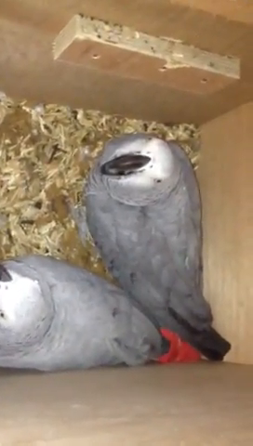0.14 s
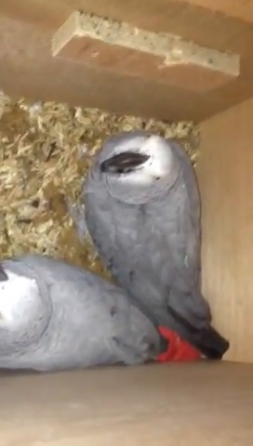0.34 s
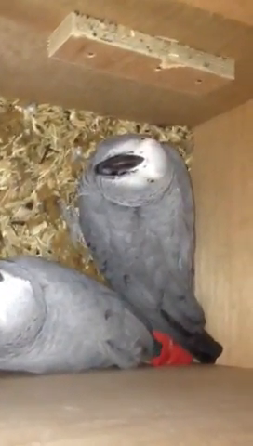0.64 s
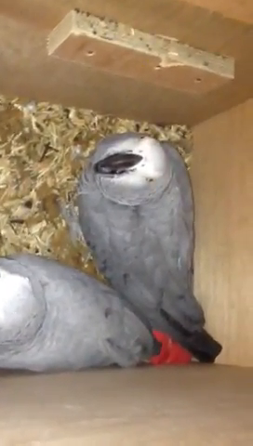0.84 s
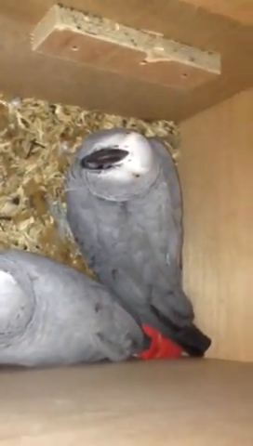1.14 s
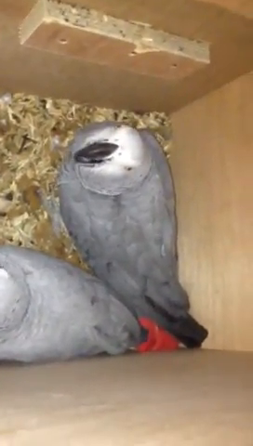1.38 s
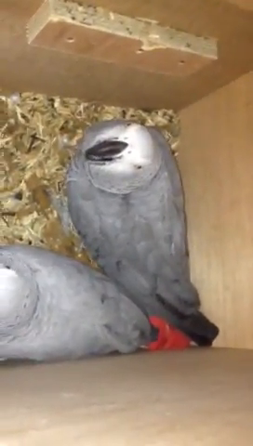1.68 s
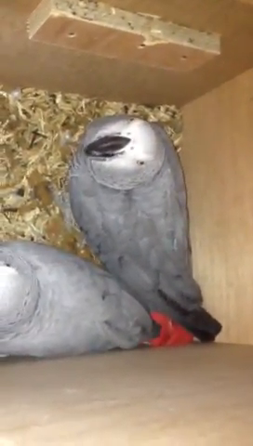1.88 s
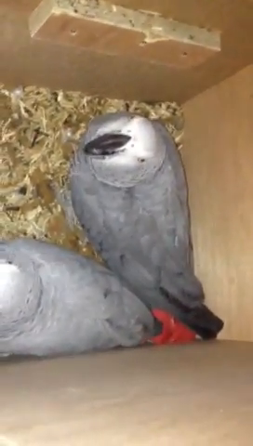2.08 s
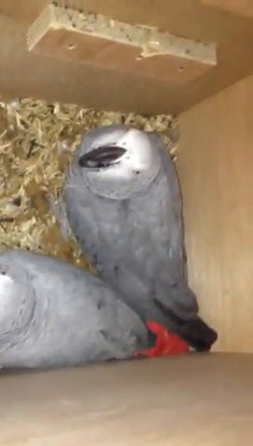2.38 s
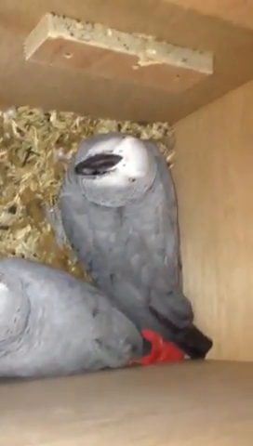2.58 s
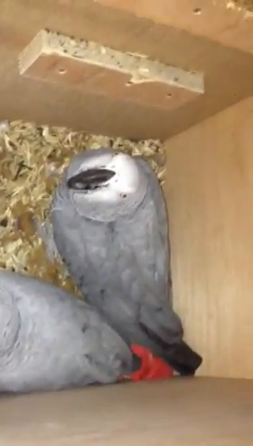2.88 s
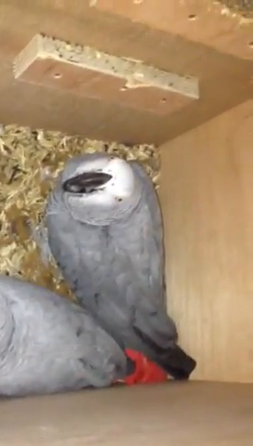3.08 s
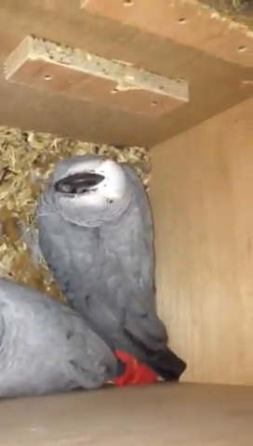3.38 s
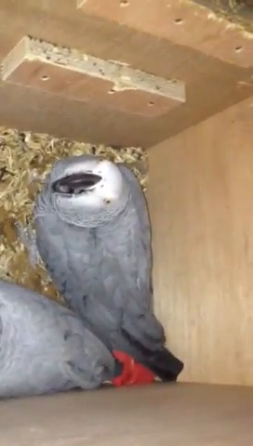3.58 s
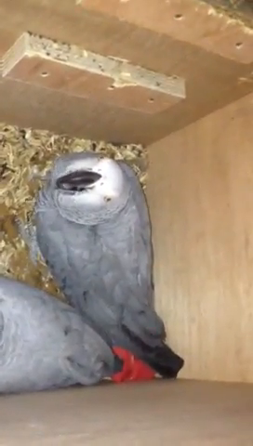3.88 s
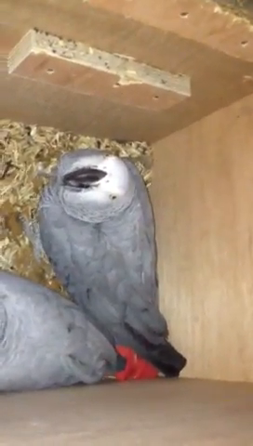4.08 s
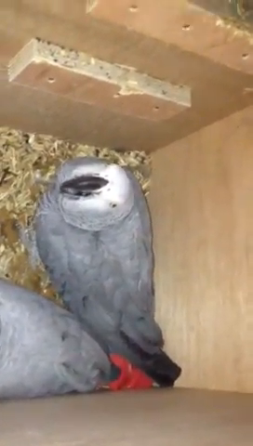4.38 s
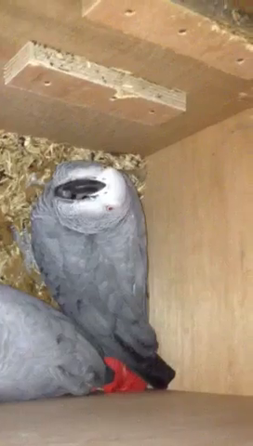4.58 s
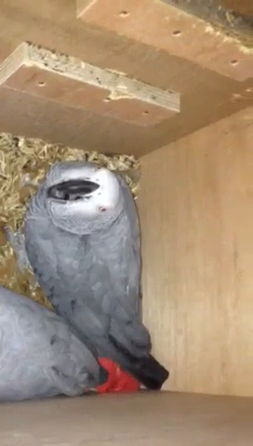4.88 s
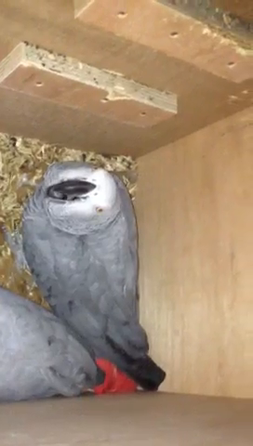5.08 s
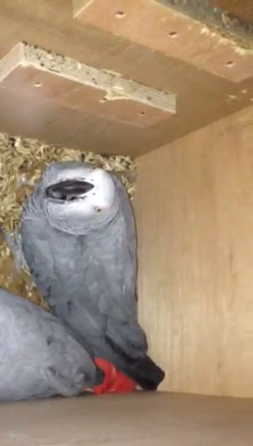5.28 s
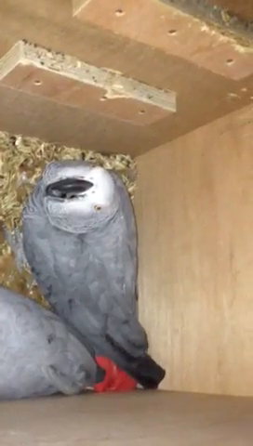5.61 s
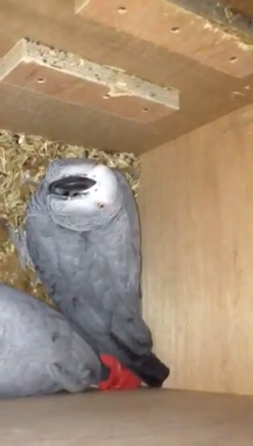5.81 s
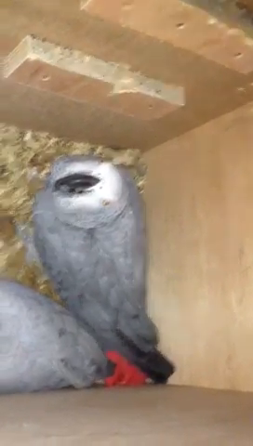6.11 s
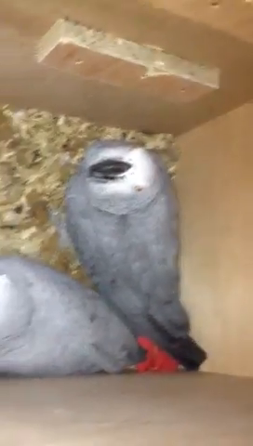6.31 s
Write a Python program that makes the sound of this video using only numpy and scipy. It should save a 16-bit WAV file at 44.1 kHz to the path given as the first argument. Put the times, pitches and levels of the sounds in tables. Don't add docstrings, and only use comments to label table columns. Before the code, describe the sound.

A close phone microphone over two parrots in a small wooden nest box; the walls answer instantly, short and dense, over faint hiss and low rumble. From 0 s both birds are already growling: one a fast, bright, hissy buzz of about two hundred pulses a second, the other a slower, coarser and broader rasp with a low chest hum. The slow growl fades toward 1.2 s, the fast one swells until both break off near 1.7 s. Faint breath, a rumble swell and a single click follow; at about 1.9 s the slow bird restarts, the fast one joining from 2.1 s. They rasp on, with closed-beak grumbling underneath, until 3.8 s. A string of dry throat clicks runs to 4.15 s over a low heave. The third, strong growl builds from 4.25 s, sagging slightly, and stops around 6.1 s, leaving irregular clicks and rumble to the end at about 6.4 s.

```python
import sys
import numpy as np
from scipy import signal
from scipy.fft import rfft, irfft
from scipy.io import wavfile
from scipy.ndimage import uniform_filter1d, minimum_filter1d, map_coordinates

SR = 44100
rng = np.random.default_rng(int(sys.argv[2]) if len(sys.argv) > 2 else 0)


def file_out(sig):
    cols = np.atleast_2d(sig).T
    lim = np.clip(cols, -1, 1)
    pcm = np.round(lim * 32767).astype(np.int16)
    wavfile.write(sys.argv[1], SR, pcm)


def how_loud(loudness_db):
    steps = np.asarray(loudness_db, float) / 20
    return 10 ** steps


N = 284445

# f/Hz, width/Hz, level/dB
SHUT_MODES = [(960, 75, -6), (1170, 155, 5.5), (1442, 250, -2), (1760, 180, 0), (2320, 400, -29),
              (3580, 590, -25), (5350, 300, -27), (7340, 500, -53), (8800, 400, -51), (10770, 700, -27),
              (11200, 600, -28), (12700, 300, -23), (14500, 900, -36)]
CALM_DB = -62.5


def unit(x):
    return x / np.sqrt(np.mean(x ** 2) + 1e-20)


def along(points, hz):
    f, v = np.transpose(points)
    return np.interp(np.log(hz + 1), np.log(f + 1), v)


def curves(rows):
    s, *cols = np.transpose(rows)
    return [np.interp(np.arange(N) / SR, s, c) for c in cols]


def wobble(rate):
    knots = rng.standard_normal(int(N * rate / SR) + 4)
    return map_coordinates(knots, [np.arange(N) * rate / SR])


def bouts(rows, sag, rest_db):
    t = np.arange(N) / SR
    power = how_loud(2 * rest_db)
    for start, rise, end, fall, db in rows:
        ramp = np.clip((t - start) / rise, 0, 1) * np.clip((end - t) / fall, 0, 1)
        held = how_loud(db - sag * np.clip(t - start - rise, 0, None))
        power = power + (ramp ** 1.4 * held) ** 2
    return 10 * np.log10(power)


def coloured(x, gain):
    m = 2 ** 14
    cepstrum = irfft(np.log(gain(np.fft.rfftfreq(m, 1 / SR)) + 1e-6), m)
    cepstrum[1:m // 2] *= 2
    cepstrum[m // 2 + 1:] = 0
    response = irfft(np.exp(rfft(cepstrum)), m)[:m // 2]
    return signal.oaconvolve(x, response)[:N]


def background(heave_db):
    # f/Hz, level/dB per Hz
    rumble_colour = [(24, -64), (40, -39), (80, -28), (123, -2.5), (204, -1.5), (259, -2.5), (310, 9.5),
                     (404, -21), (519, -8), (700, -37), (910, -62), (1540, -120)]
    # f/Hz, level/dB per Hz
    hiss_colour = [(330, -22), (400, -11.5), (460, -23.5), (530, -4.5), (600, -17.5), (720, -14.5),
                   (830, -6), (1200, -5.5), (9500, -60), (15500, -26)]
    rumble = unit(coloured(rng.standard_normal(N), lambda hz: how_loud(along(rumble_colour, hz))))
    hiss = unit(coloured(rng.standard_normal(N), lambda hz: how_loud(along(hiss_colour, hz))))
    return how_loud(heave_db + 9.0 + 1.7 * wobble(9.37)) * rumble + how_loud(-42.5) * hiss


def box(x):
    # f/Hz, t60/s
    decay = [(500, 0.13), (3000, 0.079), (12000, 0.023)]
    hz, t, z = signal.stft(rng.standard_normal(SR // 8), SR, nperseg=128)
    dying = z * how_loud(-60 * t / along(decay, hz)[:, None])
    tail = rfft(signal.istft(dying, SR, nperseg=128)[1])
    power = np.abs(tail) ** 2
    evened = np.sqrt(uniform_filter1d(power, size=120) / uniform_filter1d(power, size=12))
    tail = irfft(tail * evened)
    return signal.fftconvolve(x, tail / np.linalg.norm(tail))[:N]


def throat(x, modes, gaps):
    # f/Hz, width/Hz, lift/dB
    box_modes = [(822, 55, 6), (895, 60, -6), (1024, 50, 4), (1095, 40, -5), (1240, 45, 2.5), (1690, 50, 3),
                 (1800, 50, -7), (1942, 40, 4), (2200, 200, 4.5), (2245, 50, 1.5), (2531, 55, 4),
                 (3106, 50, 3), (3400, 45, -4), (3449, 50, 3), (3700, 200, -2), (4074, 60, 2),
                 (4600, 350, 2.5), (4737, 40, 4), (7216, 60, 4)]
    # f/Hz, level/dB
    low_cut = [(100, -22), (600, -41), (720, -14), (800, -3.5), (920, -2.5)]

    def gain(hz):
        power = sum(how_loud(2 * db) / (1 + (2 * (hz - c) / max(w, 110)) ** 2) ** 1.5 for c, w, db in modes)
        carved_db = sum(db * np.exp(-(2 * (hz - c) / w) ** 2) for c, w, db in gaps)
        lift_db = sum(db / (1 + (2 * (hz - c) / w) ** 2) for c, w, db in box_modes)
        return np.sqrt(power) * how_loud(along(low_cut, hz) + carved_db + lift_db)
    return unit(coloured(x, gain))


def rasp(cycles, jitter, scatter_db, odd_db, rise_s, burst_s, click, breath):
    at = np.flatnonzero(np.diff(np.floor(cycles)))
    chance = rng.standard_normal((len(at), 2))
    every_other_db = (odd_db * np.ones(N))[at] * (np.arange(len(at)) % 2)
    size = how_loud(scatter_db * chance[:, 0] + every_other_db)
    shifted = np.clip(at + (jitter * SR * chance[:, 1]).astype(int), 0, N - 1)
    slaps = np.bincount(shifted, size, N)
    t = np.arange(SR // 40) / SR
    puff = (1 - np.exp(-t / rise_s)) * np.exp(-t / burst_s)
    gate = unit(signal.oaconvolve(slaps, puff)[:N])
    return click * unit(slaps) + (gate + breath) * rng.standard_normal(N)


def clicks():
    # t/s, peak level/dB
    slaps = [(1.8707, -19), (3.8848, -15.5), (3.92, -29), (3.9382, -18), (3.9573, -19), (3.978, -24),
             (3.9983, -25), (4.028, -18), (4.0553, -27), (4.0841, -18), (4.1083, -24), (4.1354, -17.5),
             (6.2267, -20), (6.2454, -25), (6.266, -17.5), (6.3063, -23), (6.344, -18), (6.361, -24),
             (6.4015, -33), (6.4396, -15.5)]
    blows = np.zeros(N)
    for s, db in slaps:
        blows[round(s * SR)] = how_loud(db)
    ring = throat(blows, SHUT_MODES + [(2900, 760, -16.5)], [])
    return how_loud(-2.5) * ring * blows.max() / np.abs(ring).max()


def fast_bird():
    # f/Hz, width/Hz, level/dB
    modes = [(770, 87, -38), (1000, 81, -8.5), (1200, 208, -4.5), (1580, 970, -14.5), (2246, 255, -3.5),
             (2520, 440, -8), (3370, 260, -12), (3700, 360, -13), (4010, 280, -4.5), (4557, 334, -4.5),
             (4940, 190, -11), (6500, 2120, -19.5), (7177, 100, -10), (7660, 67, -20), (8280, 67, -35),
             (8970, 144, -14.5), (9550, 205, -19), (10330, 280, -25), (11200, 360, -35), (12000, 360, -30),
             (13000, 500, -34), (14100, 400, -31), (15100, 400, -39)]
    # f/Hz, width/Hz, depth/dB
    gaps = [(2950, 200, -7), (5490, 260, -22), (6900, 150, -6), (8150, 250, -16), (14500, 500, -8)]
    # start/s, rise/s, end/s, fall/s, level/dB
    rasping = [
        (-1.0, 1.78, 1.672, .03, -16),
        (1.6, .05, 1.87, .03, -41),
        (2.1, .5, 3.77, .14, -21.8),
        (4.05, .2, 4.3, .03, -39),
        (4.22, .2, 6.06, .2, -17.8),
    ]
    rate_hz = 207 * (1 + .025 * wobble(4) + .012 * wobble(40))
    source = rasp(np.cumsum(rate_hz) / SR, jitter=.00025, scatter_db=1.4, odd_db=-2,
                  rise_s=.0003, burst_s=.0012, click=.45, breath=.65)
    level_db = bouts(rasping, sag=1.6, rest_db=-55)
    return how_loud(level_db + 0.89 * wobble(12)) * throat(source, modes, gaps)


def slow_bird(heave_db):
    # t/s, third multiple of the pulse rate f/Hz, its level/dB
    chest = [(0.0, 308.0, -51), (0.54, 300.6, -57), (0.79, 310.8, -44.5), (1.17, 305.4, -50.5),
             (1.71, 306.9, -36), (1.83, 299.8, -41), (1.92, 310.7, -37), (2.89, 311.6, -54),
             (3.66, 311.8, -48), (3.79, 301.9, -55), (3.97, 303.6, -34.5), (4.09, 322.1, -55),
             (4.26, 314.0, -41), (4.85, 310.8, -52), (5.35, 309.4, -37.5), (5.53, 311.2, -49),
             (5.71, 312.3, -40.5), (6.45, 302.4, -41.5)]
    # t/s, breath share, second slap level/dB
    grain = [(0, .55, -8), (1.6, .27, -13), (2.25, .3, -11), (2.5, .55, -8), (3.5, .55, -8),
             (3.7, .28, -12), (4.4, .5, -9), (5.8, .55, -8), (5.95, .28, -12), (6.45, .2, -13)]
    # f/Hz, width/Hz, level/dB
    open_modes = [(770, 120, -33.5), (990, 47, -7), (1225, 295, 4), (1583, 510, 2), (1875, 190, 1.5),
                  (2154, 330, -0.5), (2490, 300, -4), (2832, 160, 1), (3160, 210, 0.5), (3430, 69, 0),
                  (4020, 1130, 0), (4670, 430, -16.5), (5300, 760, -7), (6070, 600, -3), (6750, 200, -13.5),
                  (7570, 170, -8.5), (8050, 110, -16), (8500, 220, -14.5), (8870, 230, -20),
                  (11450, 290, -15), (12750, 220, -10), (14270, 580, -17.5)]
    # f/Hz, width/Hz, depth/dB
    gaps = [(6950, 220, -14), (8600, 180, -8), (10200, 500, -12), (12100, 200, -8), (13600, 350, -14)]
    # start/s, rise/s, end/s, fall/s, level/dB
    growls = [
        (-.2, .2, 1.15, .85, -17.6),
        (1.45, .1, 1.66, .04, -27),
        (1.64, .04, 1.865, .015, -37),
        (1.865, .04, 2.3, .25, -19),
        (1.9, .2, 3.8, .33, -16.3),
        (3.6, .1, 3.82, .04, -29),
        (4.0, .2, 4.3, .05, -43),
        (4.24, .26, 5.55, .85, -15.3),
        (4.95, .5, 6.13, .15, -18.3),
        (5.9, .1, 6.185, .07, -25),
    ]
    # start/s, rise/s, end/s, fall/s, level/dB
    grumbles = [
        (-.1, .1, 1.2, .3, -36),
        (1.6, .04, 1.868, .02, -32.5),
        (1.87, .03, 2.2, .15, -24),
        (2.5, 1.0, 3.8, .08, -27),
        (3.84, .12, 4.3, .1, -35.5),
        (4.2, .1, 4.62, .2, -25.5),
        (5.0, .6, 6.19, .08, -27),
        (6.2, .04, 6.6, .1, -38),
    ]
    third_hz, third_db = curves(chest)
    breath, second_slap_db = curves(grain)
    cycles = np.cumsum(third_hz / 3 * (1 + .012 * wobble(30))) / SR

    source = rasp(2 * cycles, jitter=.0004, scatter_db=1.5, odd_db=second_slap_db,
                  rise_s=.0003, burst_s=.002, click=.5, breath=breath)
    open_db = bouts(growls, sag=1.7, rest_db=-50)
    beak = how_loud(open_db + 0.58 * wobble(9)) * throat(source, open_modes, gaps)

    grumble = rasp(2 * cycles, jitter=.0006, scatter_db=2.4, odd_db=-7,
                   rise_s=.0002, burst_s=.0013, click=.8, breath=.12)
    shut_db = bouts(grumbles, sag=0, rest_db=-50)
    shut = how_loud(shut_db + 1.5 * wobble(25)) * throat(grumble, SHUT_MODES, [])

    second_db = CALM_DB + 6.5 + 0.5 * (heave_db - CALM_DB)
    third = how_loud(third_db + 3.0 + 3.4 * wobble(18)) * np.sin(2 * np.pi * 3 * cycles)
    second = how_loud(second_db + 5.5 + 2.6 * wobble(21.6)) * np.sin(2 * np.pi * 2 * cycles)
    return beak + shut, third + second


def scene():
    # start/s, rise/s, end/s, fall/s, level/dB
    heaves = [
        (1.22, .3, 2.36, .35, -47.5),
        (3.76, .13, 4.7, .45, -46.5),
        (5.95, .4, 6.8, .1, -48),
    ]
    heave_db = bouts(heaves, sag=0, rest_db=CALM_DB)
    slow, hum = slow_bird(heave_db)
    voices = fast_bird() + slow + clicks()
    return (voices + how_loud(-15) * box(voices) + hum + background(heave_db))[None]


def top_cut(x):
    return signal.sosfilt(signal.butter(12, 15710, fs=SR, output="sos"), x)


def record(dry):
    # f/Hz, level/dB
    mic_band = [(30, -26), (60, -13), (95, -10), (120, -1.5), (15240, 0.5), (15330, -28), (15900, -36)]
    needed = np.minimum(1, .74 / (np.abs(dry[0]) + 1e-9))
    gain = uniform_filter1d(minimum_filter1d(needed, size=90), size=90)
    heard = coloured(dry[0] * gain, lambda hz: how_loud(along(mic_band, hz)))
    return top_cut(heard[None])


dry = scene()
out = record(dry)
file_out(out)
```